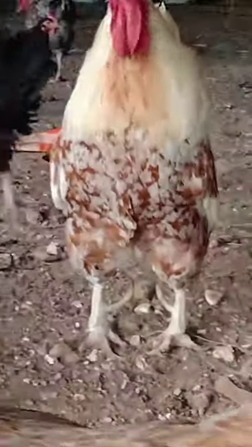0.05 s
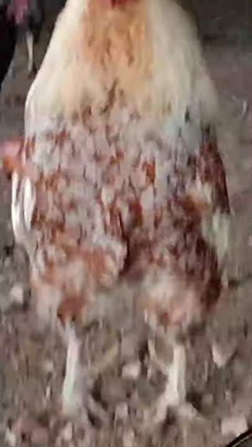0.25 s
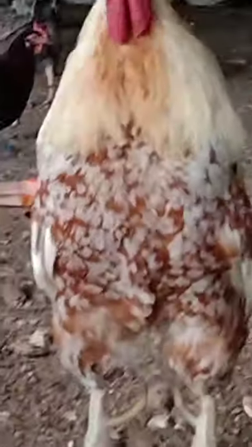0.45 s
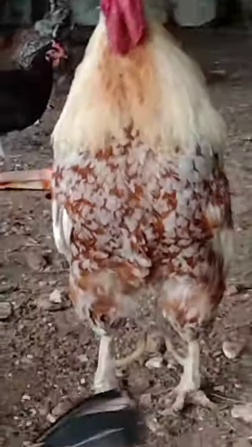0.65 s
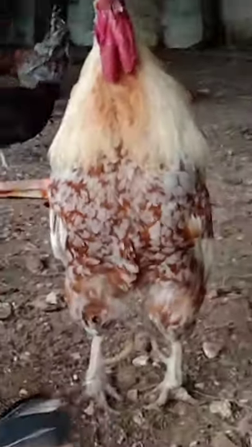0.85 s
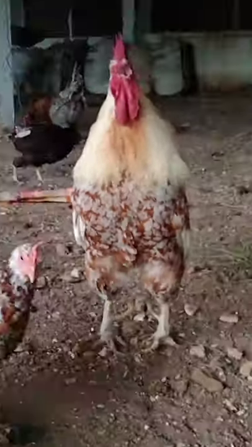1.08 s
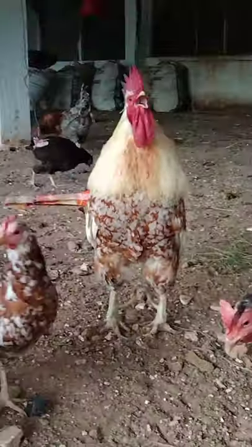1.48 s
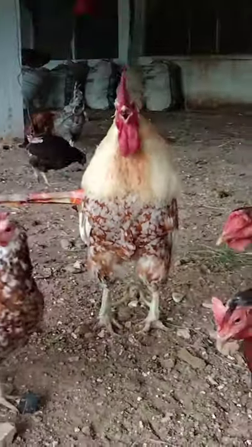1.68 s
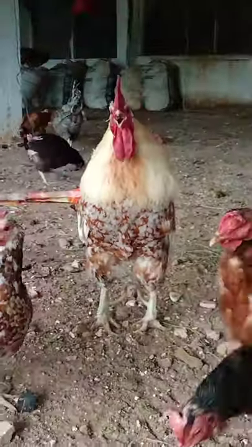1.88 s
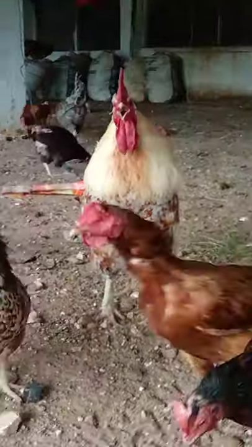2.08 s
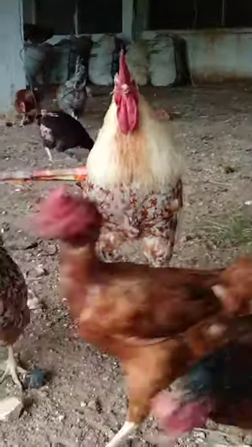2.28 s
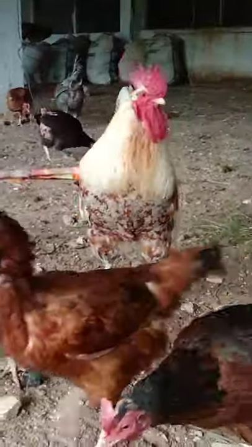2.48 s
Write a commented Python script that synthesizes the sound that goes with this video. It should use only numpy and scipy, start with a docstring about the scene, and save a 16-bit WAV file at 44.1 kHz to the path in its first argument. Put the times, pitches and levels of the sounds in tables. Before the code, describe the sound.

One loud rooster crow fills a quiet yard, heard up close. A hen calls softly as the flock briefly stirs, then come two hoarse notes and a long, clear, falling one, echoing faintly off shed walls.

```python
"""A quiet farmyard, one microphone close to a rooster. A hen calls softly and the flock stirs. Then he
crows once: a short hoarse note and a long rasping one, his syrinx jittering and slipping into period
doubling. A clear held note follows, with side tones for a while from a second oscillation in the syrinx.
It sinks and ends in a low rattling groan and a puff of air. The shed walls answer faintly."""
import sys
import numpy as np
from scipy import signal
from scipy.fft import rfft, irfft, next_fast_len
from scipy.io import wavfile
from scipy.ndimage import map_coordinates

SR = 44100
rng = np.random.default_rng(int(sys.argv[2]) if len(sys.argv) > 2 else 0)


def output_pcm(signal):
    """Save a mono or channel-first signal as 16-bit PCM at the path in sys.argv[1].

    Samples are clipped to [-1, 1] before scaling.
    """
    pcm = np.clip(np.atleast_2d(signal).T, -1, 1) * 32767
    wavfile.write(sys.argv[1], SR, np.round(pcm).astype(np.int16))


N = 116865

# the two hoarse notes, levels before HOARSE_TRIM_DB
# (time [s], pitch [Hz], fundamental [dB], second partial [dB], overtones [dB])
OPENING_NOTE = [(0.23, 553, -40, -52, -23.5), (0.248, 625.2, -23, -32.5, -17.5),
                (0.284, 706.7, -28, -11.5, -22.5), (0.308, 715.5, -32.5, -19.5, -27),
                (0.334, 737.5, -24, -14, -23.5), (0.36, 696, -69.5, -27.5, -27),
                (0.382, 712, -26, -19.5, -25.5), (0.406, 756, -48, -31, -59)]
RASPING_NOTE = [(0.48, 743.5, -41, -35, -36.5), (0.494, 743.8, -21.5, -29, -29.5),
                (0.552, 842.7, -19.5, -13, -33), (0.574, 836.3, -23.5, -28.5, -32),
                (0.612, 764.2, -24.5, -27, -24.5), (0.754, 887.6, -20.5, -20.5, -23.5),
                (0.814, 879.5, -23, -21, -23.5), (0.846, 796.2, -27, -29, -25.5),
                (0.946, 753.7, -27, -29, -18.5), (0.966, 795.4, -26, -29.5, -22.5),
                (1.104, 776.7, -28, -32, -25), (1.125, 740, -26, -24, -21)]
HOARSE_TRIM_DB = (-1, 0, -4)  # fundamental, second partial, overtones
# clear overtones as the rasping note enters (time [s], partials 3 to 5 [dB each])
ENTRY_PARTIALS = [(.5, -65.5, -54.5, -55.5), (.53, -44.5, -32, -31.5), (.562, -52, -32, -30),
                  (.58, -29, -29, -29.5), (.62, -44.5, -28, -37.5), (.65, -74.5, -59, -70)]
# period doubling, tones halfway between the partials (time [s], level [dB])
DOUBLING = [(.58, -56.5), (.63, -31), (.7, -25.5), (.78, -27), (.83, -30), (.9, -26), (.96, -27.5),
            (1.1, -41.5), (1.14, -46.5)]
# the held note (time [s], pitch [Hz], partials 1 to 5 [dB each], higher overtones [dB])
HELD_NOTE = [(1.12, 740.1, -26, -28, -34, -35, -45, -46), (1.148, 717.9, -27, -22, -36, -24, -42, -38),
             (1.196, 743.2, -28, -22, -40, -37, -48, -47), (1.214, 752.2, -33, -23, -39, -42, -33, -49),
             (1.282, 771.7, -35, -18, -45, -37, -36, -44), (1.352, 779.8, -30, -22, -60, -48, -43, -40),
             (1.388, 770.5, -31, -15, -58, -42, -38, -43), (1.456, 765.1, -41, -15, -64, -47, -43, -45),
             (1.554, 761.6, -39, -21, -54, -46, -43, -44), (1.656, 761.5, -44, -17, -54, -47, -42, -45),
             (1.788, 760.5, -42, -17, -52, -43, -49, -45), (1.822, 714.6, -34, -17, -48, -44, -49, -45),
             (1.908, 705.4, -33, -18, -48, -38, -54, -41), (2.006, 694.7, -37, -20, -48, -46, -55, -43),
             (2.042, 690.6, -39, -19, -45, -31, -49, -43), (2.174, 673.3, -46, -25, -56, -35, -44, -45),
             (2.192, 672, -44, -38, -64, -29, -43, -47), (2.22, 667, -45, -23, -67, -29, -43, -47),
             (2.266, 658.9, -37, -19, -47, -31, -39, -47), (2.322, 644.4, -35, -28, -40, -32, -43, -45),
             (2.354, 621.6, -35, -28, -38, -50, -41, -43), (2.388, 596, -35, -39, -33, -39, -46, -51)]
# roughness through the crow (time [s], pitch jitter [share], rasp [dB])
HOARSENESS = [(.225, 0.064, -23.5), (.245, 0.038, -24.5), (.285, 0.0064, -38), (.32, 0.0097, -39),
              (.345, 0.034, -17.5), (.39, .03, -37), (.475, 0.052, -25), (.51, 0.042, -15),
              (.53, .008, -33), (.585, .008, -32), (.605, 0.036, -21), (.65, 0.015, -29), (.78, 0.01, -32),
              (.825, 0.022, -25.5), (.88, .012, -33.5), (.945, 0.013, -32.5), (.98, 0.028, -24.5),
              (1.1, 0.023, -24), (1.14, 0.0085, -34.5), (1.22, 0.0024, -46.5), (1.35, .002, -49.5),
              (1.8, .0025, -48.5), (1.85, 0.0016, -61.5), (2.2, 0.0024, -62), (2.31, .008, -48),
              (2.4, 0.017, -42.5)]
# throat and beak on the hoarse notes, then through the held note (frequency [Hz], gain [dB])
OPENING_THROAT = [(200, -40), (450, -14.5), (620, -9), (1200, 1.5), (1600, 7), (2070, -9), (2450, -23),
                  (2900, -7.5), (3300, -23.5), (4100, -23.5), (4750, -44), (6100, -22), (7300, -31.5),
                  (9500, -51.5), (14000, -51)]
RASPING_THROAT = [(200, -34.5), (400, -24.5), (560, -24), (760, 2.5), (1000, -6.5), (1300, -1), (1700, 8.5),
                  (2100, -16.5), (2500, -6.5), (3050, -2), (3600, -14.5), (4200, -6), (4700, -37.5),
                  (5050, -20.5), (5400, -38.5), (6000, -17.5), (6500, -31.5), (7000, -14), (7500, -32.5),
                  (7900, -25.5), (10500, -44.5), (14000, -40), (15500, -41)]
RISING_THROAT = [(5400, -22), (6150, -10), (7000, -0.5), (7700, -21), (9300, -19.5), (10200, -32),
                 (14500, -27)]
STEADY_THROAT = [(4600, -19), (5400, -13), (6100, 0), (7600, -18.5), (10000, -35), (14800, -30.5)]
SINKING_THROAT = [(4200, -7), (4900, -22), (6300, 0), (6950, -28), (7500, -7), (8100, -24), (9000, -22),
                  (11300, -39), (14500, -29)]
# colour of the held note's side tones and rasp, and of the last puff (frequency [Hz], gain [dB])
SIDE_COLOUR = [(520, -18.5), (1000, -8.5), (1280, -2.5), (1770, 1.5), (2020, -19.5), (2520, -35),
               (2800, -7), (3290, -19), (4050, -14.5), (4700, -42), (5100, -22), (6300, -18), (11000, -50),
               (14500, -31)]
HELD_RASP_COLOUR = [(400, -30), (1550, 2), (2300, -25), (3100, -18), (10000, -50)]
PUFF_COLOUR = [(100, -23), (500, 1), (1500, 0.5), (2500, -18), (9000, -54.5)]
# the closing groan (time [s], level [dB])
GROAN_LEVEL = [(2.37, -61), (2.404, -25.5), (2.45, -50), (2.49, -44), (2.58, -50.5), (2.65, -65)]
# throat resonances in the groan (centre [Hz], width [Hz], gain [dB])
GROAN_RESONANCES = [(587, 77, 11), (1375, 240, -5), (2560, 120, -11), (5900, 2600, -32)]
# the hen's call (time [s], pitch [Hz], level [dB])
HEN_CALL = [(0, 332.7, -44), (.044, 326, -43), (.06, 310, -66), (.09, 319, -63), (.16, 325, -77.5)]
# her throat (frequency [Hz], gain [dB])
HEN_THROAT = [(330, .5), (1320, -13.5), (2650, -31), (3900, -32.5), (5000, -68)]
# echo off the sheds (frequency [Hz], time to fall 60 dB [s])
WALL_DECAY = [(200, .45), (1500, .45), (5000, .35), (14000, .2)]
# the flock stirring (time [s], level [dB])
STIR_LEVEL = [(0, -62), (.05, -54.5), (.1, -74), (.15, -64), (.19, -81), (.23, -90)]
# colour of the flock and of the open air (frequency [Hz], gain [dB])
STIR_COLOUR = [(150, 0.5), (1300, 26), (1800, -17.5), (12000, -46.5)]
AIR_COLOUR = [(25, -43), (55, -10.5), (100, 3.5), (200, 1.5), (600, -2.5), (1300, -23), (2000, -20),
              (5000, -22.5), (15000, -39)]

# when each note and the side tones sound (start [s], end [s])
OPENING_S, RASPING_S, HELD_S, SIDE_S = (0.2245, 0.407), (0.4706, 1.125), (1.118, 2.402), (1.359, 1.81)
TOP_HZ = 15600


def amp(db):
    return 10 ** (np.asarray(db) / 20)


def unit(x):
    return x / np.sqrt(np.mean(x ** 2) + 1e-20)


def along(points, hz):
    """Read (frequency, value) points on a log axis."""
    f, v = np.transpose(points)
    return np.interp(np.log(hz + 1), np.log(f + 1), v)


def curves(rows):
    """One value per sample for each column after the time."""
    times, *columns = np.transpose(rows)
    return [np.interp(np.arange(N) / SR, times, column) for column in columns]


def gate(span, attack_s=0.0039, release_s=0.013):
    """Attack, hold and release over a span of time."""
    t = np.arange(N) / SR
    return np.clip((t - span[0]) / attack_s, 0, 1) * np.clip((span[1] - t) / release_s, 0, 1)


def wobble(rate):
    """A smooth random curve, rate knots a second."""
    return map_coordinates(rng.standard_normal(int(N * rate / SR) + 4), [np.arange(N) * rate / SR])


def filtered(x, response):
    """x through a frequency response."""
    size = next_fast_len(N + SR // 2)
    return irfft(rfft(x, size) * response(np.fft.rfftfreq(size, 1 / SR)), size)[:N]


def coloured(x, colour):
    return filtered(x, lambda hz: amp(along(colour, hz)))


def noise(colour, pulsing=1):
    """Noise of rms 1, optionally pulsed before it is coloured."""
    return unit(coloured(rng.standard_normal(N) * pulsing, colour))


def cycle(pitch):
    """Phase in radians of a vibration at this pitch."""
    return 2 * np.pi * np.cumsum(pitch) / SR


def tone(phase, db):
    """One partial at an rms level."""
    return np.sqrt(2) * amp(db) * np.sin(phase)


def partials(phase, pitch, orders, throat, flutter, strength=1, swell_db=2.0):
    """Multiples of a vibration, each fluttering and slowly swelling, through a throat; rms near 1."""
    source = 0
    for k in orders:
        level = (1 + flutter * wobble(59.91)) * amp(swell_db * (wobble(7.98) - 1 / 4))
        source += (k * pitch < TOP_HZ) * level * np.sin(k * phase + rng.uniform(0, 2 * np.pi))
    power = sum(amp(along(throat, k * pitch)) ** 2 for k in orders) / 2
    return coloured(source * strength / np.sqrt(power + 1e-20), throat)


def hoarse_note(rows, span, throat, count=22, rattle_db=2.3, rattle_hz=72):
    """The rooster, close up: a jittering syrinx with period doubling and a rasp of air once a cycle."""
    pitch, first_db, second_db, upper_db = curves(rows)
    first_trim, second_trim, upper_trim = HOARSE_TRIM_DB
    jitter, rasp_db = curves(HOARSENESS)
    doubling_db, = curves(DOUBLING)
    phase = cycle(pitch * (1 + jitter * (0.885 * wobble(420) + 0.243 * wobble(90))))
    shudder = 1 + 7 * jitter * wobble(300)
    uneven_pulse = np.sin(cycle(rattle_hz * (1 + wobble(110) / 3))) - .2
    rattle = amp(rattle_db * np.minimum(jitter / .016, 1) * uneven_pulse)
    low = shudder * (tone(phase, first_db + first_trim) + tone(2 * phase, second_db + second_trim))
    low += sum(tone(k * phase, db) for k, db in enumerate(curves(ENTRY_PARTIALS), 3))
    low = filtered(low, lambda hz: 1 - 1 / (1 + (hz / 400) ** 6))  # low cut at 400 Hz
    shake = shudder * rattle
    upper = partials(phase, pitch, np.arange(3, count), throat, flutter=0.38, strength=shake)
    halfway = partials(phase, pitch, np.arange(count) + .5, throat, flutter=0.5, strength=shake)
    rasp = amp(rasp_db) * noise(throat, rattle * (1 + np.cos(phase)))
    return gate(span) * (low + amp(upper_db + upper_trim) * upper + amp(doubling_db) * halfway + rasp)


def held_note(count=26, morph_s=.05):
    """The syrinx settles into a clear tone; the throat changes shape as it rises, steadies and sinks."""
    pitch, *low_db, upper_db = curves(HELD_NOTE)
    jitter, rasp_db = curves(HOARSENESS)
    phase = cycle(pitch * (1 + jitter * wobble(250) / 2 + .0008 * wobble(35)))
    voice = sum(tone(k * phase, db) for k, db in enumerate(low_db, 1))
    steadied, sunk = (np.clip((np.arange(N) / SR - s) / morph_s + .5, 0, 1) for s in SIDE_S)
    shares = (1 - steadied, steadied * (1 - sunk), sunk)
    orders = np.arange(len(low_db) + 1, count)
    for throat, share in zip((RISING_THROAT, STEADY_THROAT, SINKING_THROAT), shares):
        voice += amp(upper_db) * np.sqrt(share) * partials(phase, pitch, orders, throat, flutter=0.19)
    voice += side_tones(phase, count)
    rasp = amp(rasp_db) * noise(HELD_RASP_COLOUR, 1 + np.cos(phase))
    return gate(HELD_S) * (voice + rasp)


def side_tones(phase, count, rate_hz=239.7, gain_db=-30):
    """A slower second oscillation of the syrinx puts a tone above and below each partial."""
    slow = np.sin(cycle(rate_hz * (1 + 0.028 * wobble(90))))
    harmonics = sum(np.sin(k * phase + rng.uniform(0, 2 * np.pi)) for k in range(1, count))
    return amp(gain_db) * coloured(gate(SIDE_S, attack_s=0.039) * slow * harmonics, SIDE_COLOUR)


def groan(rate_hz=120, air=0.81):
    """Slack, uneven pulses and air ring the rooster's throat as the crow ends."""
    def throat(hz):
        return sum(amp(db) * (1j * hz * width / (centre ** 2 - hz ** 2 + 1j * hz * width)) ** 2
                   for centre, width, db in GROAN_RESONANCES)

    level_db, = curves(GROAN_LEVEL)
    pulse_count = np.floor(np.cumsum(rate_hz * (1 + 0.21 * wobble(70))) / SR)
    drive = unit(np.diff(pulse_count, prepend=0)) + air * rng.standard_normal(N)
    return gate((GROAN_LEVEL[0][0], N / SR + 1)) * amp(level_db) * unit(filtered(drive, throat))


def puff(at_s=2.404, width_s=0.011, peak_db=-34):
    """Air escapes as the syrinx lets go."""
    envelope = np.exp(-.5 * ((np.arange(N) / SR - at_s) / width_s) ** 2)
    return amp(peak_db) * envelope * noise(PUFF_COLOUR)


def hen():
    """A hen in the yard: one soft, low call, slightly falling."""
    pitch, level_db = curves(HEN_CALL)
    phase = cycle(pitch * (1 + 0.01 * wobble(60)))
    return amp(level_db) * partials(phase, pitch, np.arange(1, 15), HEN_THROAT, flutter=0.22)


def shed_walls(birds, level_db=-13, build_s=0.027):
    """The sheds scatter the calls back to the microphone; the treble dies first."""
    hz, t, spectrum = signal.stft(rng.standard_normal(SR // 2), SR, nperseg=256)
    decay = amp(-60 * t / along(WALL_DECAY, hz)[:, None])
    _, tail = signal.istft(spectrum * decay, SR, nperseg=256)
    tail *= np.clip(np.arange(len(tail)) / SR / build_s, 0, 1)
    return amp(level_db) * signal.fftconvolve(birds, tail / np.linalg.norm(tail))[:N]


def yard(air_db=-67):
    """Behind the calls: quiet open air, and the flock stirring at the start."""
    stir_db, = curves(STIR_LEVEL)
    air = amp(air_db + 1.5 * wobble(14)) * noise(AIR_COLOUR)
    flock = amp(stir_db + 2.5 * wobble(50)) * noise(STIR_COLOUR)
    return air + flock


def scene():
    """The farmyard in mono: rooster up front, then hen, sheds and open air."""
    opening = hoarse_note(OPENING_NOTE, OPENING_S, OPENING_THROAT)
    rasping = hoarse_note(RASPING_NOTE, RASPING_S, RASPING_THROAT)
    birds = opening + rasping + held_note() + groan() + puff() + hen()
    return (birds + shed_walls(birds) + yard())[None]


def record(dry):
    """The recorder keeps nothing above its band limit."""
    return filtered(dry[0], lambda hz: hz < TOP_HZ)[None]


dry = scene()
out = record(dry)
output_pcm(out)
```